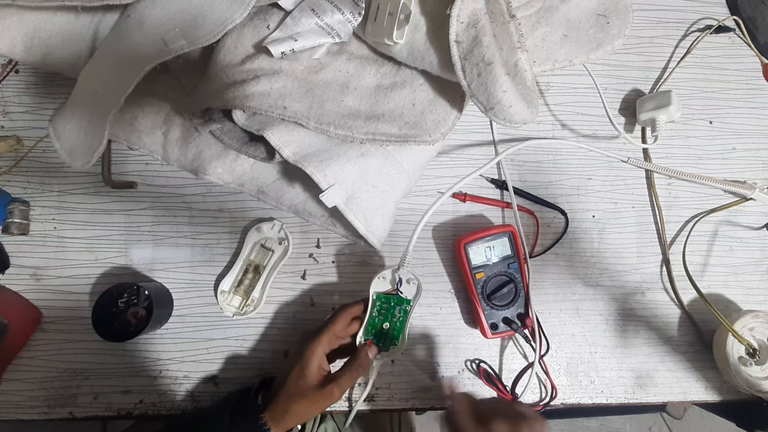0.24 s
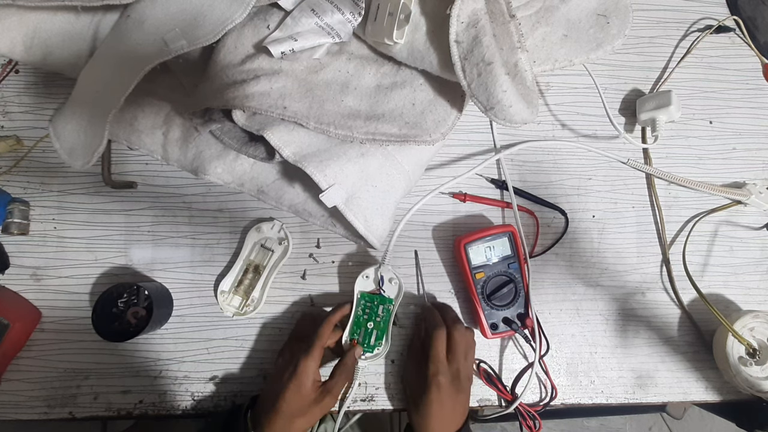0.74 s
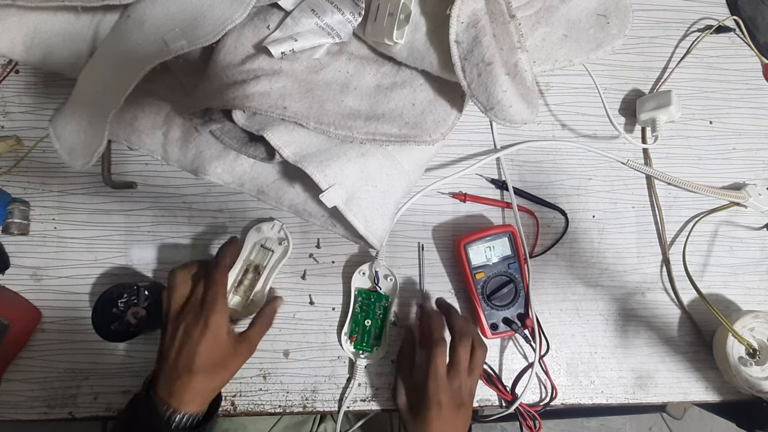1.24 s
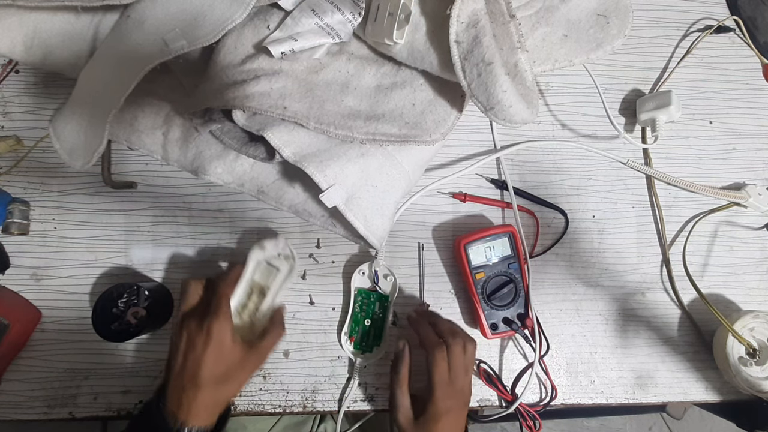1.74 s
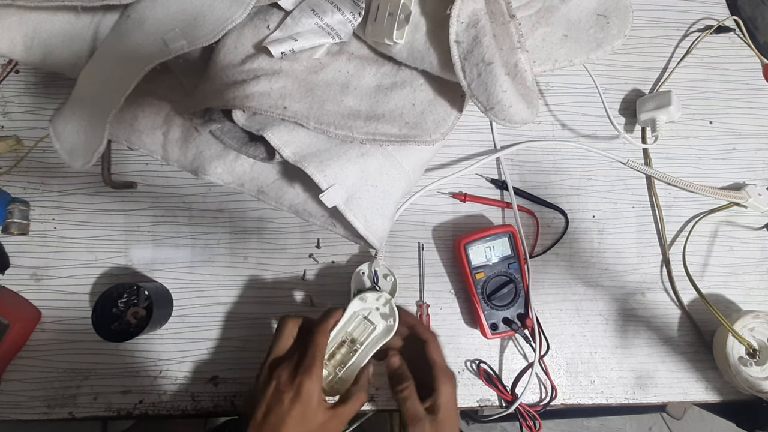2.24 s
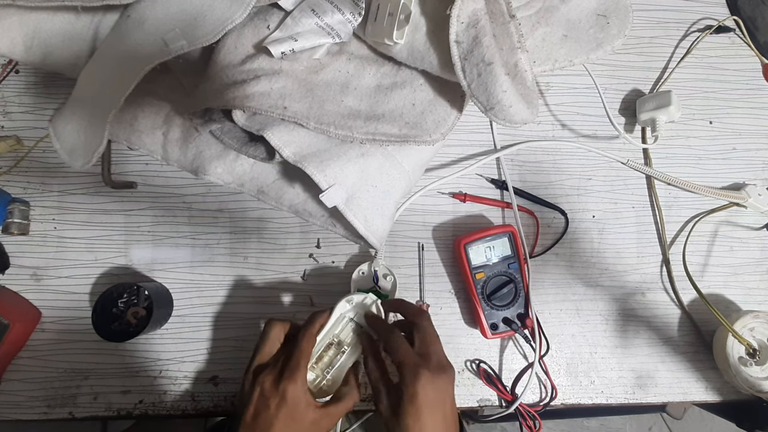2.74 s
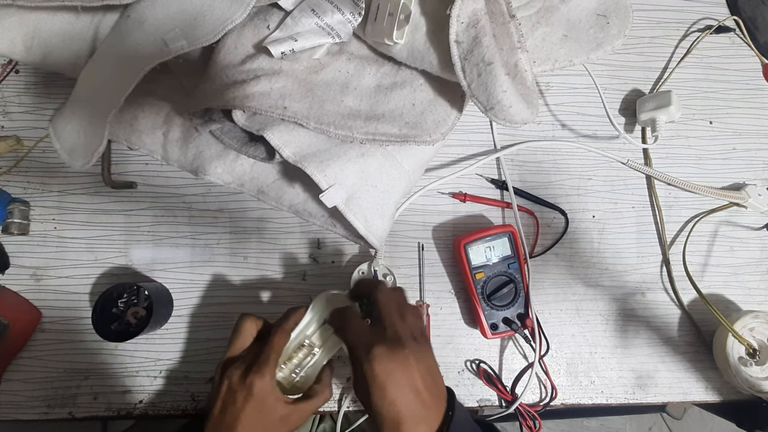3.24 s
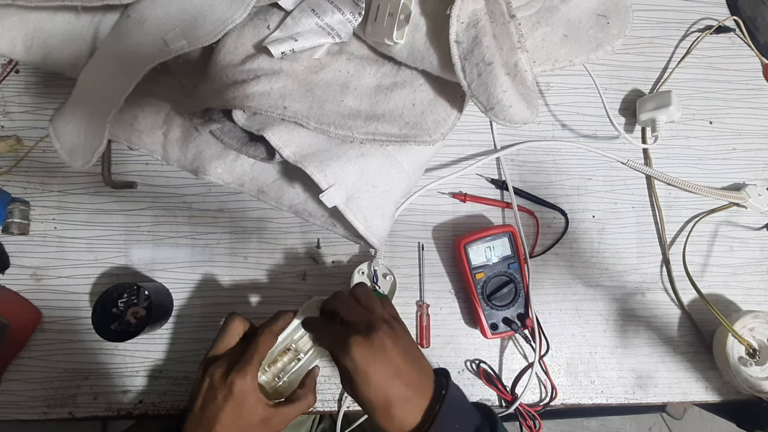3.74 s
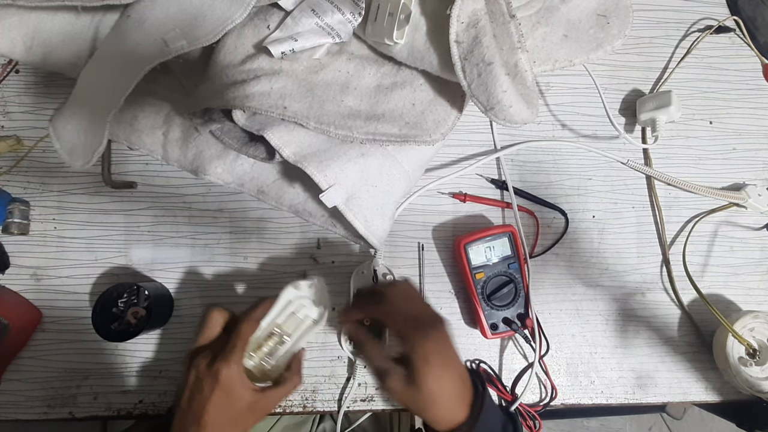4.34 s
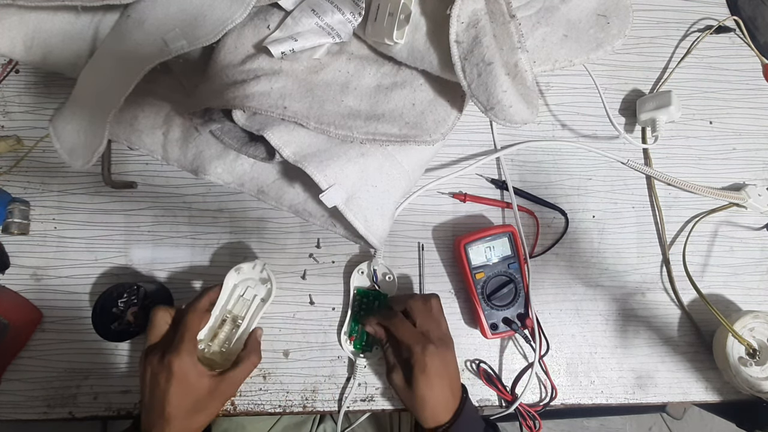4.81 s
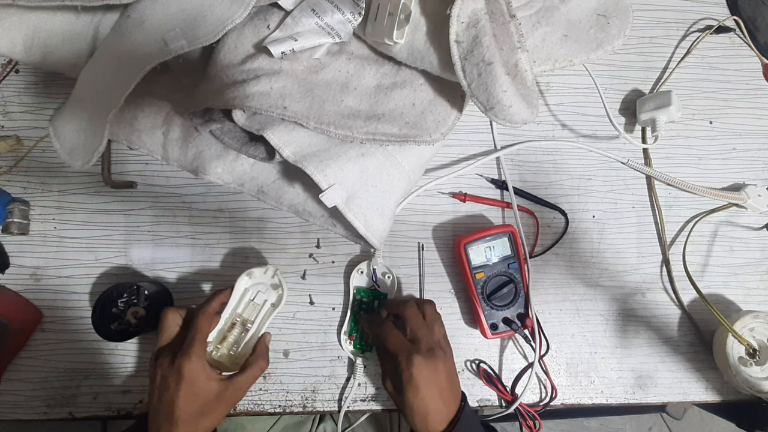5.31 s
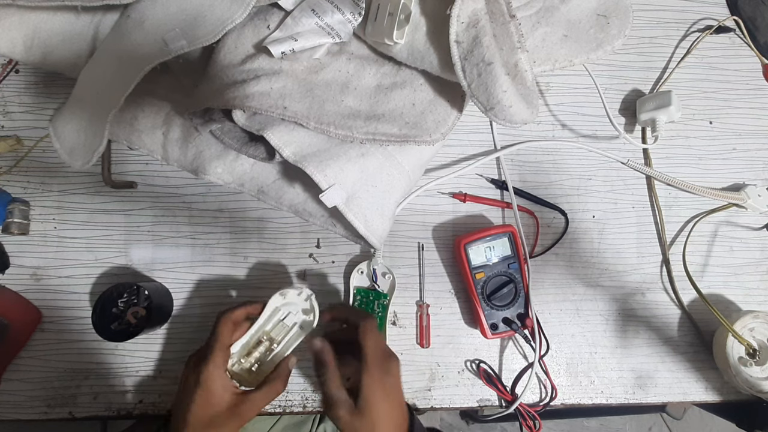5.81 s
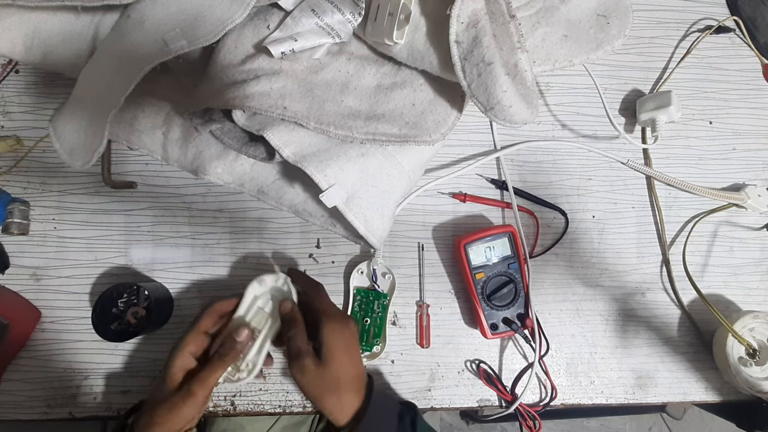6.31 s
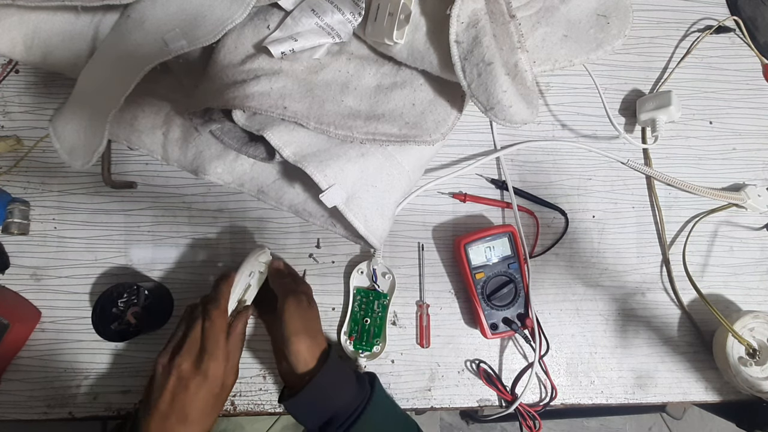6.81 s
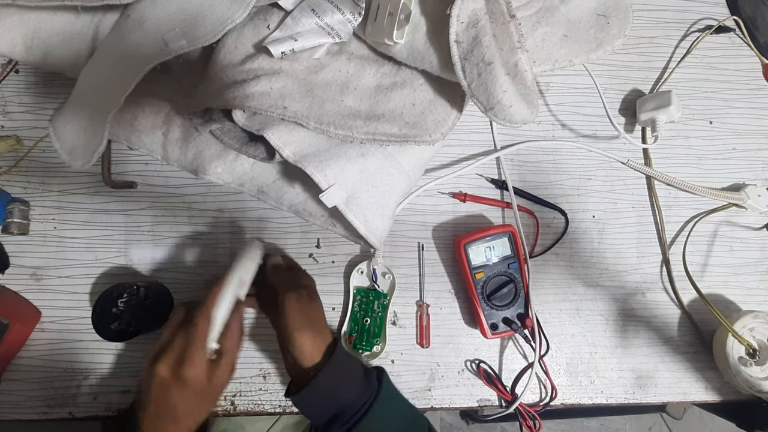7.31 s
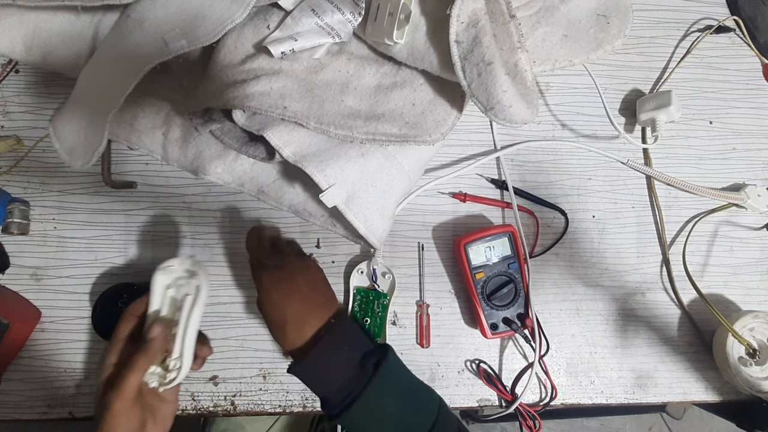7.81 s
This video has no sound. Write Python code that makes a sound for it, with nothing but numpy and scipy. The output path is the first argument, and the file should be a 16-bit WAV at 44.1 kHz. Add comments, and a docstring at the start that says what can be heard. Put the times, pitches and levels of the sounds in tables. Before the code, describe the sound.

Close, jerky cloth rustling at a quiet bench, an early bright tool clatter with thuds, then sparse plastic clicks as everything fades to near silence.

```python
"""Jacket sleeves and cables rub from the start, close to a phone microphone in a small, quiet room: noise in jerks.
In the first second and a half a screwdriver clatters down on a workbench: short bright cracks and ringing modes.
Then a small plastic housing is picked up, turned in the hands and tried on a circuit board, with light clicks
(short cracks through shell resonances) and scrapes (resonant grains). At last the cloth fades, over a low rumble,
room noise and a faint narrow whistle that fades too."""
import sys
import numpy as np
from scipy import signal
from scipy.fft import rfft, irfft, next_fast_len
from scipy.io import wavfile
from scipy.ndimage import map_coordinates

SR = 44100
rng = np.random.default_rng(int(sys.argv[2]) if len(sys.argv) > 2 else 0)


def transcribe(signal):
    """Save signal, clipped to [-1, 1], as a 16-bit WAV file at the path in sys.argv[1]."""
    frames = np.atleast_2d(signal).T
    limited = np.clip(frames, -1, 1)
    pcm = np.round(limited * 32767).astype(np.int16)
    wavfile.write(sys.argv[1], SR, pcm)


N = 355446

# All levels are mix settings before the phone's colouring.
# Each move of an arm slides a sleeve: [start t/s, length t/s, weave hiss level/dB, fold rub re hiss level/dB]
SLEEVE_STROKES = [(0, 0.077, -42, -6.5), (0.176, 0.064, -43.5, -18), (.27, 0.29, -52, -5.5),
                  (0.512, 0.12, -46, -2.5), (0.65, 0.097, -52.5, -0.5), (0.838, 0.091, -45.5, 0),
                  (1.183, 0.14, -41.5, -9.5), (1.307, 0.12, -44.5, -10), (1.397, 0.22, -36.5, -12),
                  (1.595, 0.22, -39, -13), (1.84, 0.15, -46, -12), (2.033, 0.26, -44, -14),
                  (2.259, 0.065, -39.5, -11.5), (2.555, 0.3, -38.5, -18.5), (2.847, 0.22, -39.5, -15.5),
                  (3.094, .15, -43.5, -15), (3.259, 0.1, -35, -19.5), (3.33, .13, -52, -13),
                  (3.516, 0.35, -48.5, -19), (3.622, 0.091, -42, -19.5), (3.946, 0.33, -42, -19.5),
                  (4.142, 0.37, -25.5, -15.5), (4.373, 0.69, -36, -17), (4.76, 0.16, -34.5, -14.5),
                  (4.864, 0.57, -41, -15.5), (5.345, 0.3, -41, -15.5), (5.661, 0.86, -42, -12),
                  (6.305, 0.19, -38.5, -8.5), (6.46, 0.3, -44.5, -15), (6.712, .14, -50, -11)]
# Slow cloth creep between moves, until the arms rest: [t/s, hiss level/dB]
CLOTH_CREEP = [(0, -54), (1.9, -48), (2.45, -52), (3.5, -58.5), (4.2, -50), (6.72, -56), (6.92, -67.5),
               (7.85, -70.5), (8.06, -83)]
# Hiss of the weave, relative spectrum: [f/Hz, level/dB per Hz]
WEAVE_SPECTRUM = [(150, -45.5), (500, -16.5), (1000, -7.5), (1600, -0.5), (2500, -1), (4500, 0), (7500, 2),
                  (11500, -1.5), (15500, -3)]
# Rub of the folds, relative spectrum: [f/Hz, level/dB per Hz]
FOLD_SPECTRUM = [(50, -17.5), (130, -7.5), (280, -0.5), (550, 0.5), (850, -1), (1300, -1), (2200, -3),
                 (4000, -1), (9000, -43.5)]
# Hard things near the hands send the rustle back: [delay t/s, gain before treble loss]
NEARBY_REFLECTIONS = [(.0021, 0.22), (.0047, 0.31), (.0083, .15), (0.014, 0.11)]
# Low bumps and swells of rumble, the first after the screwdriver falls: # [start t/s, length t/s, rumble
# level/dB]
LOW_RUMBLES = [(1.0, 0.93, -64.5), (2.73, 0.12, -66), (2.987, .1, -59), (4.425, 0.075, -61),
               (6.028, .26, -60), (6.402, 0.18, -61.5), (7.475, 0.093, -58.5), (7.747, 0.3, -73)]
# Rumble of the bench, relative spectrum: [f/Hz, level/dB per Hz]
RUMBLE_SPECTRUM = [(20, -17), (45, -6), (68, 2.5), (130, -2.5), (220, -14.5), (500, -36), (1500, -86)]
# Quiet of the room, relative spectrum: [f/Hz, level/dB per Hz]
QUIET_SPECTRUM = [(25, -18), (80, 2.5), (140, 5.5), (220, -5), (400, -7), (1000, -9), (2500, -14.5),
                  (5000, -8.5), (8000, -20.5), (15000, -11.5)]
# Fade of the faint whistle: [t/s, level/dB]
WHISTLE_FADE = [(6.8, -73.5), (7.4, -82), (8, -101)]
# Tool and hands meet the bench, relative levels:
# [t/s, clack level/dB, clack centre f/Hz, thud level/dB, rattle length t/s]
BENCH_KNOCKS = [(.038, -40.5, 574, -44, .03), (0.315, -32, 1443, -48.5, 0.02),
                (.706, -38.5, 2700, -52.5, .003), (0.8338, -23, 2210, -44, .003),
                (.839, -19, 2060, -38.5, .014), (.988, -15, 2150, -31.5, .085),
                (1.1553, -25, 1187, -40, .003), (1.204, -34, 1000, -48.5, .003),
                (1.237, -33.5, 1512, -47.5, .003), (1.488, -36, 435, -52, .003)]
# Modes of the bench top and what lies on it: [f/Hz, relative level/dB, t60 t/s]
BENCH_MODES = [(71, -15, 0.31), (119.5, -3.5, 0.44), (179.7, -14.5, 0.39), (223.6, -0.5, 0.18),
               (261.6, -4.5, 0.25), (399.6, -9.5, 0.22), (448, -12, 0.32), (1106, -12, 0.44),
               (1517, -12, 0.44), (1770, -12.5, 0.3), (2065, -10, .33), (2490, -9, .35), (2860, -9, .4)]
# Decay of the room: [f/Hz, t60 t/s]
ROOM_DECAY = [(150, 0.66), (600, 0.35), (2000, 0.33), (4500, 0.17), (12000, 0.14)]
# Hard edges tick: bright cracks of the screwdriver's blows, then light clicks of the plastic housing,
# relative levels: [t/s, tick level/dB, centre f/Hz, ring re tick level/dB]
EDGE_CLICKS = [(.204, -29, 3500, -21), (.7057, -28, 3000, -9), (.8333, -27.5, 3370, 3.5),
               (.9938, -25, 12550, 6), (1.0245, -21.5, 2800, 0.5), (1.495, -27.5, 5670, -3),
               (1.865, -19, 9500, -14), (1.886, -28.5, 5950, -12), (3.2567, -13.5, 4670, -7),
               (3.2734, -25, 2320, -6), (3.851, -35.5, 6930, -14), (4.405, -40, 6600, -16),
               (5.1795, -22.5, 5000, -16), (6.5863, -20.5, 6670, -9), (6.6255, -27, 6000, -6),
               (6.8056, -30, 6500, -8), (6.8272, -42.5, 5950, 5), (7.046, -55.5, 4000, 7),
               (7.1452, -24, 4100, -6.5), (7.149, -21, 6560, -9.5), (7.2956, -43, 4750, -8.5),
               (7.837, -54, 8790, -1), (7.968, -53.5, 3800, -9.5)]
# Resonances of the hollow housing, which colour every tick: [f/Hz, width f/Hz, level/dB]
SHELL_MODES = [(1450, 310, -1), (2357, 750, -5.5), (4650, 1020, 2.5), (5100, 900, -6.5), (7400, 1500, 0),
               (11730, 3500, -3.5)]
# Tool, fingers and housing dragged over the bench: [middle t/s, length t/s, relative level/dB, resonance f/Hz]
BENCH_SCRAPES = [(0.563, 0.15, -55.5, 690), (0.764, .17, -53.5, 2880), (.77, .16, -57.5, 1460),
                 (1.225, .17, -45, 1230), (1.219, .14, -46.5, 386), (1.499, .13, -52, 355),
                 (1.955, 0.11, -51, 2730), (2.318, 0.1, -46.5, 2600), (2.761, .17, -60, 464),
                 (7.72, .4, -79, 293), (7.96, 0.078, -74, 2300)]
# Stereo width of the noises: [f/Hz, left-right correlation]
STEREO_LIKENESS = [(70, 1), (140, 0.67), (300, 0.68), (700, 0.028), (1400, -0.35), (5000, 0.084)]
# The left port is shaded from the work: [f/Hz, left minus right level/dB]
LEFT_SHADE = [(110, -3), (220, -4.5), (400, -7), (750, -1.5), (1200, -14), (2400, -7.5), (4400, -11.5),
              (7400, -19.5), (8400, -30.5), (10500, -6), (15000, -7.5)]

CREEP_RUB_DB = -20  # folds relative to the hiss
STROKE_ARCH, STROKE_SETTLE_S = 1.21, 0.021  # power grows as speed to this exponent; time constant of settling
NEARBY_DULL_HZ = 6800  # reflections are halved here and fall further above
DRAG_RUMBLE_DB, DRAG_GROWS = -69, .15  # level at full-scale hiss; dB of rumble per dB of hiss
# first gap; each gap over the one before; loss at the end of the rattle's length
RATTLE_GAP_S, RATTLE_SLOWS, RATTLE_LOSS_DB = .006, 1.22, 9.5
TOP_HZ = 15750  # band limit of the phone


def amp(db):
    """Decibels to gain."""
    return 10 ** (np.asarray(db) / 20)


def unit(x):
    """x at rms 1."""
    return x / np.sqrt(np.mean(x ** 2) + 1e-20)


def along(points, hz):
    """Read (Hz, value) points on a log frequency axis."""
    f, v = np.transpose(points)
    return np.interp(np.log(hz + 1), np.log(f + 1), v)


def curves(rows):
    """One value per sample for each column after the time."""
    s, *cols = np.transpose(rows)
    return [np.interp(np.arange(N) / SR, s, c) for c in cols]


def wobble(rate):
    """A smooth random curve with rate knots a second."""
    knots = rng.standard_normal(int(N * rate / SR) + 4)
    return map_coordinates(knots, [np.arange(N) * rate / SR])


def filtered(x, response):
    """Shape x by a response of frequency."""
    n = x.shape[-1]
    m = next_fast_len(n + SR // 10)
    spectrum = rfft(x, m) * response(np.fft.rfftfreq(m, 1 / SR))
    return irfft(spectrum, m)[..., :n]


def resonance(hz, centre_hz, width_hz):
    """A causal resonance with gain 1 at its centre."""
    return 1j * hz * width_hz / (centre_hz ** 2 - hz ** 2 + 1j * hz * width_hz)


def add(track, s, sound):
    """Mix a sound into a track at time s."""
    part = track[..., round(s * SR):][..., :sound.shape[-1]]
    part += sound[..., :part.shape[-1]]


def diffuse(pair):
    """Blend two unrelated noises into a sound field whose left-right likeness follows frequency."""
    def mid_side(hz):
        turn = np.arccos(np.clip(along(STEREO_LIKENESS, hz), -1, 1)) / 2
        return np.array([np.cos(turn), np.sin(turn)])

    mid, side = filtered(pair, mid_side)
    return np.array([mid + side, mid - side])


def rush(spectrum, grain_db=0):
    """Stereo noise of rms 1, made of countless tiny slips whose sizes scatter by grain_db."""
    slips = rng.standard_normal((2, N)) * amp(grain_db * wobble(1500))
    return unit(filtered(diffuse(slips), lambda hz: amp(along(spectrum, hz))))


def swell(start_s, length_s):
    """Power of one movement: its speed rises and falls in an arch, and the sound settles just after it."""
    progress = np.clip((np.arange(N) / SR - start_s) / length_s, 0, 1)
    speed = np.sin(np.pi * progress)
    keep = np.exp(-1 / (STROKE_SETTLE_S * SR))
    return signal.lfilter([1 - keep], [1, -keep], np.abs(speed) ** STROKE_ARCH)


def sliding():
    """Gains of the weave's hiss and the folds' rub: powers of the arm strokes add to a slow creep."""
    creep_db, = curves(CLOTH_CREEP)
    hiss_power = amp(creep_db) ** 2
    rub_power = amp(creep_db + CREEP_RUB_DB) ** 2
    for s, length, hiss_db, rub_db in SLEEVE_STROKES:
        stroke = amp(hiss_db) ** 2 * swell(s, length)
        hiss_power = hiss_power + stroke
        rub_power = rub_power + amp(rub_db) ** 2 * stroke
    return np.sqrt(hiss_power), np.sqrt(rub_power)


def sleeves(hiss_gain, rub_gain):
    """Cloth slides on cloth and bench in small jerks, sways between the ports and reflects off things nearby."""
    jerks_db = 1.3 * wobble(40)
    sway_db = .4 * wobble(4) * np.array([[1], [-1]])
    hiss = hiss_gain * rush(WEAVE_SPECTRUM, grain_db=1.76)
    rub = rub_gain * rush(FOLD_SPECTRUM, grain_db=2.0)
    cloth = (hiss + rub) * amp(jerks_db + sway_db)

    def with_reflections(hz):
        returned = sum(gain * np.exp(-2j * np.pi * hz * delay) for delay, gain in NEARBY_REFLECTIONS)
        return 1 + returned / (1 + (hz / NEARBY_DULL_HZ) ** 2)

    return filtered(cloth, with_reflections)


def background(hiss_gain):
    """Rumble follows the sliding and swells in bumps, over room noise; a narrow whistle fades near the end."""
    drag = amp(DRAG_RUMBLE_DB) * hiss_gain ** DRAG_GROWS
    bump_power = sum(amp(db) ** 2 * swell(s, length) for s, length, db in LOW_RUMBLES)
    rumble_gain = np.sqrt(drag ** 2 + bump_power)
    noise = rng.standard_normal((2, N))
    whistle = unit(filtered(noise, lambda hz: resonance(hz, centre_hz=1553, width_hz=80) ** 2))
    whistle_db, = curves(WHISTLE_FADE)
    return rumble_gain * rush(RUMBLE_SPECTRUM) + amp(-69.0) * rush(QUIET_SPECTRUM) + amp(whistle_db) * whistle


def contact(centre_hz, spread, crack_t60, order):
    """One short crack: noise with a quick rise and exponential decay, in a band round centre_hz."""
    t = np.arange(SR // 15) / SR
    edges = np.clip([centre_hz / (1 + spread), centre_hz * (1 + spread)], 20, SR / 2 - 2000)
    envelope = amp(-60 * t / crack_t60) * (1 - np.exp(-t / 0.0014))
    burst = diffuse(rng.standard_normal((2, len(t)))) * envelope
    band = signal.butter(order, edges, "band", fs=SR, output="sos")
    crack = signal.sosfilt(band, burst)
    # even out the energy of each channel
    return crack / np.sqrt(np.sum(crack ** 2, axis=1, keepdims=True) / (crack_t60 * SR)) / 8


def room_tail():
    """A fresh stereo tail, left energy 1; each frequency dies at its own speed."""
    noise = diffuse(rng.standard_normal((2, SR * 3 // 4)))
    hz, t, z = signal.stft(noise, SR, nperseg=256)
    decay = amp(-60 * t / along(ROOM_DECAY, hz)[:, None])
    tail = signal.istft(z * decay, SR, nperseg=256)[1]
    return tail / np.linalg.norm(tail[0])


def echo(crack):
    """The room answers one crack: its right channel convolved with a fresh stereo tail."""
    return signal.fftconvolve(crack[1:], room_tail(), axes=1)


def rattle(length_s, count=9):
    """(delay s, loss dB) of the contacts of a thing rocking to rest: ever slower and weaker."""
    delays = RATTLE_GAP_S * np.r_[0, np.cumsum(RATTLE_SLOWS ** np.arange(count))]
    losses = RATTLE_LOSS_DB * (delays / length_s) ** 2
    return [(delay, loss) for delay, loss in zip(delays, losses) if loss < 20]


def bench_ring(hardness_hz, attack=.005, scatter_db=7.5, port_phase=0.57):
    """Bench modes at new strengths for each blow; a soft blow hardly reaches those above its hardness."""
    t = np.arange(SR * 3 // 4) / SR
    ring = 0
    for hz, db, t60 in BENCH_MODES:
        # higher modes reach the two ports less in step
        phase = port_phase * hz / 200 * rng.standard_normal((2, 1))
        reach = 1 / np.sqrt(1 + (hz / hardness_hz) ** 4)
        strength_db = db + scatter_db * rng.standard_normal()
        tone = np.sin(2 * np.pi * hz * t + phase)
        ring = ring + reach * amp(strength_db - 60 * t / t60) * tone
    return ring * (1 - np.exp(-t / attack))


def knocks():
    """Each contact clacks (soft fingers low, screwdriver handle high), thumps the boards and rings the bench."""
    out = np.zeros((2, N))
    for s, clack_db, centre_hz, thud_db, rattle_s in BENCH_KNOCKS:
        for delay, loss_db in rattle(rattle_s):
            clack = contact(centre_hz, spread=0.42, crack_t60=0.019, order=2)
            clack = amp(clack_db - loss_db + 4.5) * clack
            thump = contact(centre_hz=274, spread=0.94, crack_t60=0.039, order=2)
            thump = amp(thud_db - loss_db + 7.0) * thump
            add(out, s + delay, clack + thump)
            add(out, s + delay, echo(amp(1.0) * clack + amp(-0.5) * thump))
            add(out, s + delay, amp(thud_db - loss_db - 3.5) * bench_ring(centre_hz))
    return out


def clicks(body_db=-1):
    """Hard edges of screwdriver, then housing, tick for milliseconds; resonances colour the tick and its echo."""
    ticks, rings = np.zeros((2, 2, N))
    for s, db, centre_hz, ring_db in EDGE_CLICKS:
        tick = amp(db) * contact(centre_hz, spread=1.14, crack_t60=0.0098, order=2)
        add(ticks, s, tick)
        add(rings, s, amp(ring_db + 11.5) * echo(tick))

    def shell(f):
        return sum(amp(db) * resonance(f, hz, width) for hz, width, db in SHELL_MODES)

    return amp(-1.5) * ticks + filtered(amp(body_db) * ticks + rings, shell)


def scrapes():
    """Small stick-slip grains swell and fade in one resonance of the dragged thing."""
    out = np.zeros((2, N))
    for s, length, db, hz in BENCH_SCRAPES:
        n = round(length * SR)
        slips = diffuse(rng.standard_normal((2, n))) * amp(4.0 * wobble(300)[:n])
        grain = filtered(slips, lambda f: resonance(f, hz, 0.46 * hz) ** 2)
        add(out, s - length / 2, amp(db + 3) * unit(grain) * np.hanning(n))
    return out


def scene():
    """Everything heard at the bench."""
    hiss_gain, rub_gain = sliding()
    cloth_and_room = sleeves(hiss_gain, rub_gain) + background(hiss_gain)
    return cloth_and_room + knocks() + clicks() + scrapes()


def record(dry):
    """The phone adds a small nasal peak and a treble dip, shades the left port and cuts off the top."""
    def phone(hz):
        peak = 1 + .5 * resonance(hz, centre_hz=1550, width_hz=37)
        dip = 1 - 0.76 * resonance(hz, centre_hz=8880, width_hz=2630)
        ports = amp([along(LEFT_SHADE, hz), 0 * hz])
        return peak * dip * ports * (hz < TOP_HZ)

    return filtered(dry, phone)


dry = scene()
out = record(dry)
transcribe(out)
```